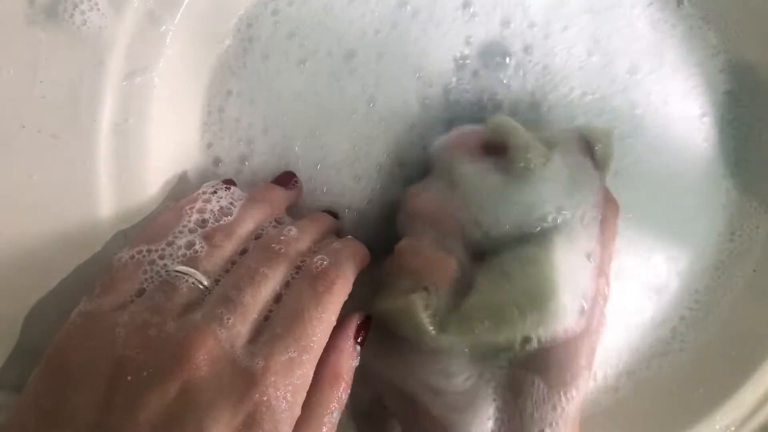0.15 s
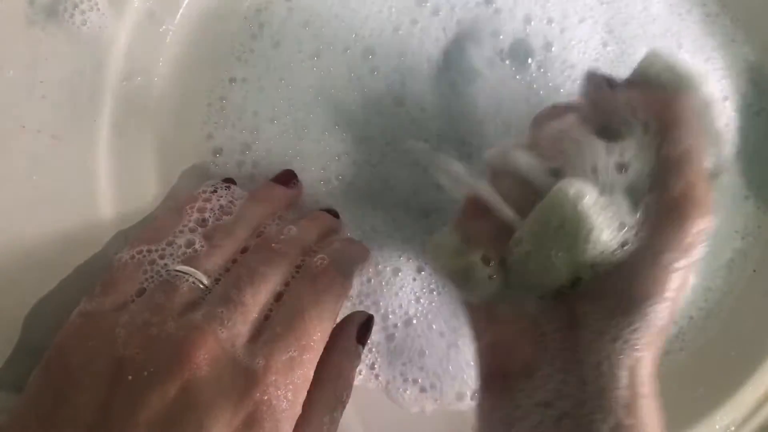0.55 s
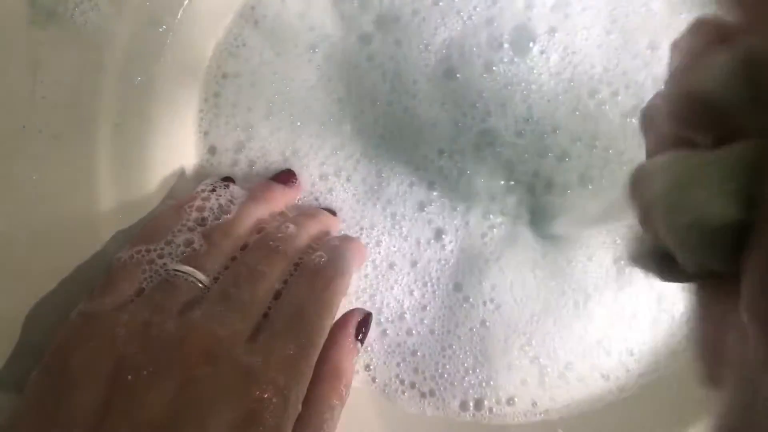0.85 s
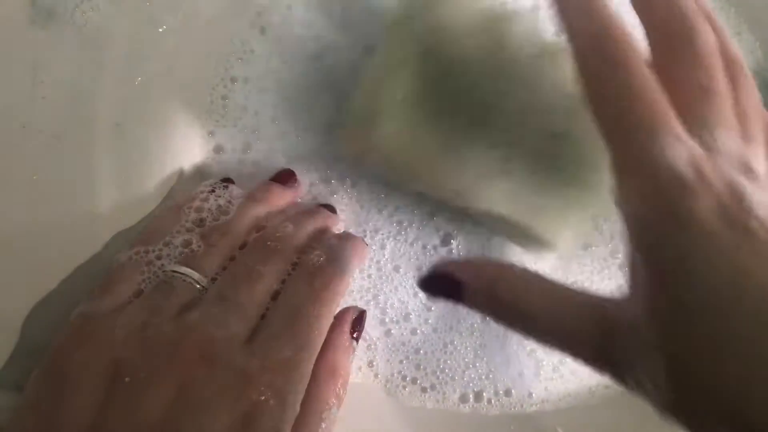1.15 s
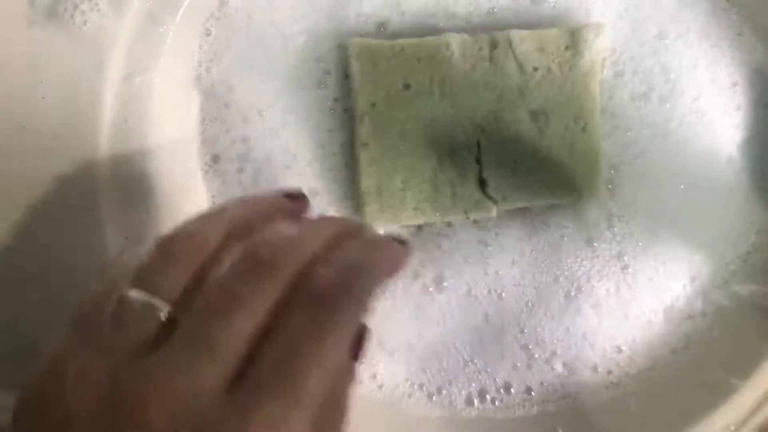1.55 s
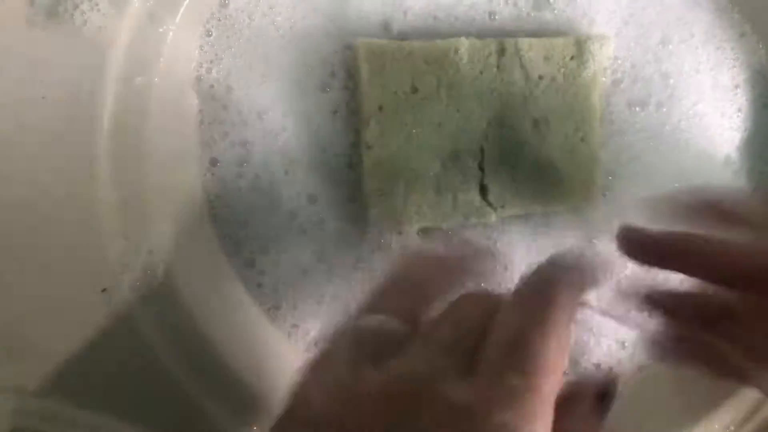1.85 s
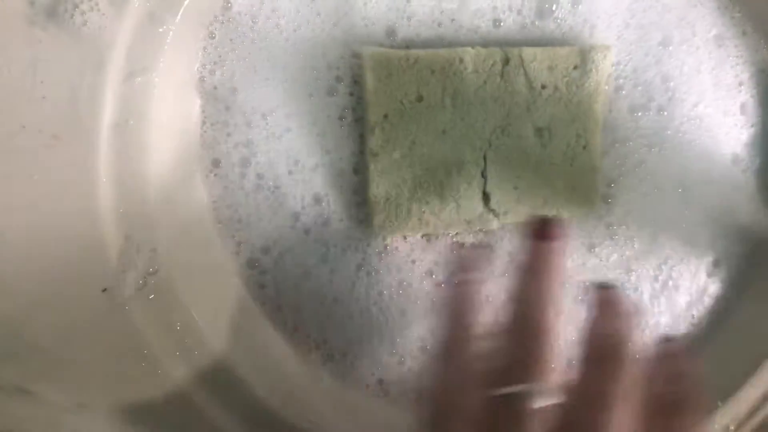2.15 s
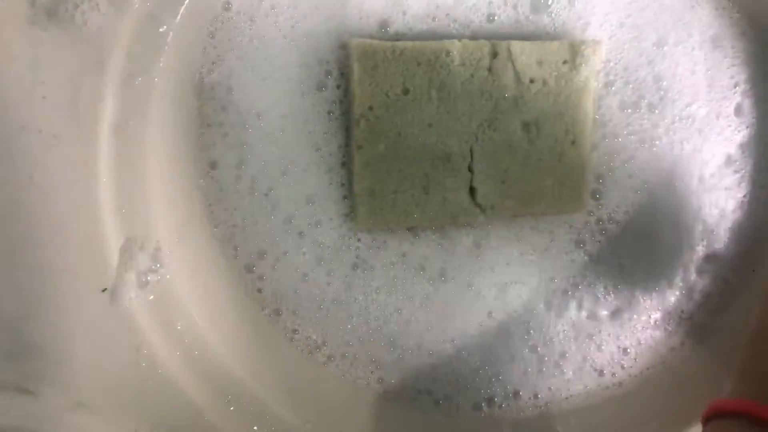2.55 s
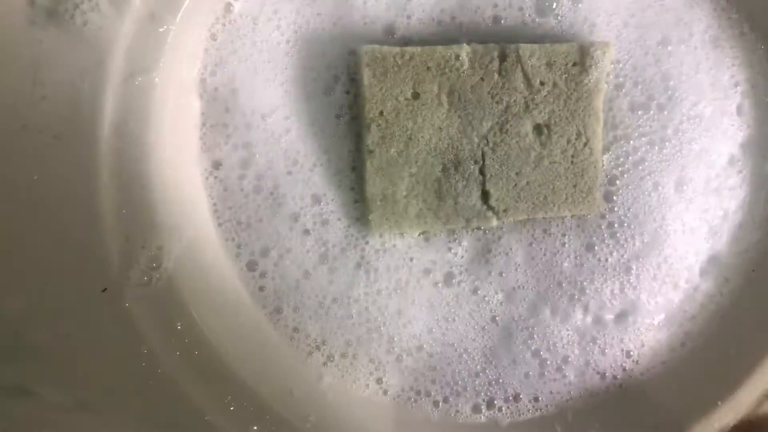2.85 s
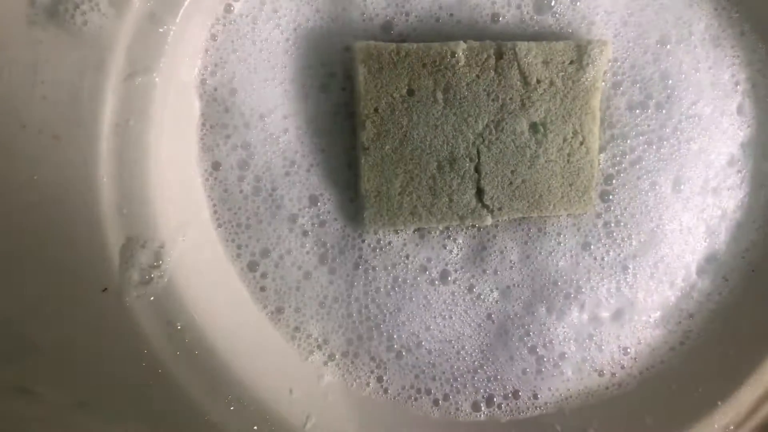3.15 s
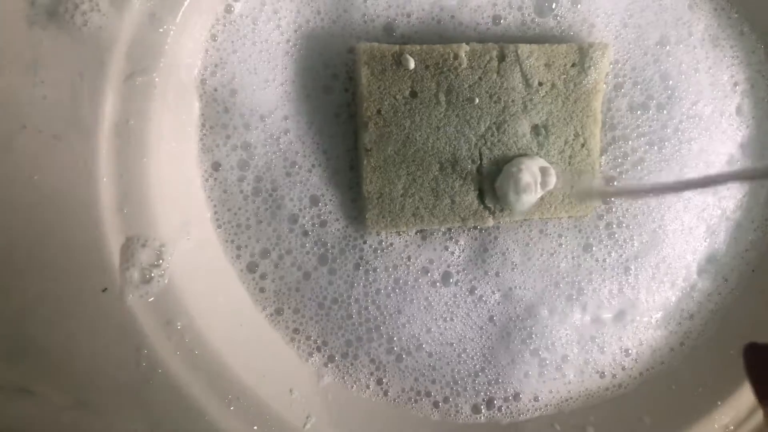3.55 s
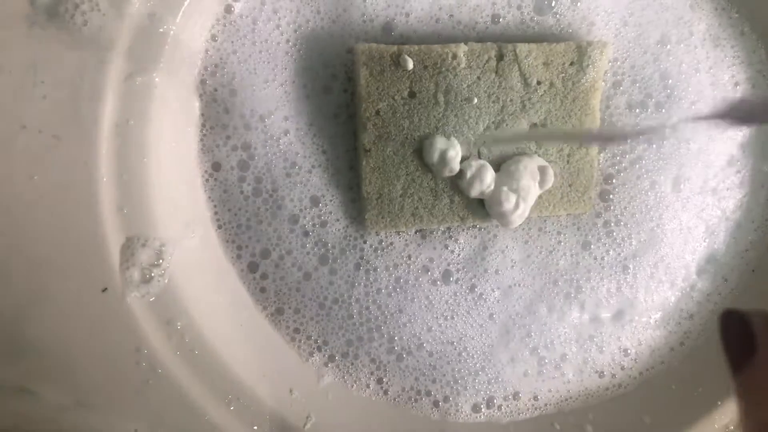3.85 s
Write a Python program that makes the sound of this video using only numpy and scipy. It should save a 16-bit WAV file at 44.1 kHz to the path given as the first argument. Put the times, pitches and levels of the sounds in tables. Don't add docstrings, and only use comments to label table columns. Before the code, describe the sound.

Foam spurts and gurgles out of a spray can, preceded by wet sponge squelching and taps

```python
import sys
import numpy as np
from scipy import signal
from scipy.fft import rfft, irfft, next_fast_len
from scipy.io import wavfile

SR = 44100
rng = np.random.default_rng(int(sys.argv[2]) if len(sys.argv) > 2 else 0)


def voltage_ratio(decibels):
    exponent = np.asarray(decibels, float) / 20
    return 10 ** exponent


def put_to_file(sound):
    columns = np.atleast_2d(sound).T
    safe = np.clip(columns, -1, 1)
    whole_steps = np.round(safe * 32767)
    wavfile.write(sys.argv[1], SR, whole_steps.astype(np.int16))


N = 176400

# (frequency [Hz], density [dB per Hz])
ROOM_COLOUR = [(30, -47), (66, -3.5), (117, -6), (230, -5.5), (300, -5), (520, -10), (950, -15),
               (1500, -24)]
# (frequency [Hz], width [Hz], level [dB])
MOTOR_TONES = [(120.5, 9.3, -47), (165.5, 16, -50.5), (307.6, 6.7, -52.5)]
# (frequency [Hz], density [dB per Hz])
FOAM_COLOUR = [(900, -20), (1700, -5), (4000, -8.5), (9000, -13), (16500, -23.5)]
# (time [s], gain [dB])
CHANGE_GAIN = [
    (2.188, -11.5),
    (2.194, -10),
    (2.194, -55),
    (2.217, -65),
    (2.233, -51),
    (2.239, -26),
    (2.258, -12),
]

# (time [s], peak [dB], tail level [dB], tail t60 [s])
SPONGE_DROP = [
    (1.234, -54, -46, 0.05),
    (1.238, -29, -30, 0.067),
    (1.2475, -23, -21, 0.04),
    (1.2520, -22, -25, 0.04),
    (1.260, -25, -45, 0.24),
    (1.2655, -19.5, -40.5, 0.017),
]
RIM_TAPS = [
    (1.944, -43.5, -41.5, 0.22),
]
CAN_SET_DOWN = [
    (2.520, -7.5, -30.5, 0.16),
]
CAP_KNOCKS = [
    (2.836, -38, -55, 0.13),
    (3.028, -29, -61, 0.057),
]
CONTACT_TICKS = [
    (1.2510, -21.5, -34.5, 0.087),
    (1.9440, -29, -43, 0.26),
    (2.5110, -28, -43, 0.053),
]
# (frequency [Hz], level [dB], t60 [s])
BASIN_MODES = [(355, -2, 0.028), (593, -1, 0.031), (950, -4.5, 0.027), (1920, 0, .012), (2980, -8, 0.0093)]
CAN_MODES = [(154, -7, 0.031), (584, -4.5, 0.022), (1000, -2, 0.013), (1320, -5.5, 0.05),
             (1760, -3.5, 0.0037)]
CAP_MODES = [(600, 3, 0.023), (2140, 6, 0.02), (3000, -4, .006)]
TICK_MODES = [(3720, 1, 0.0019), (7500, 9, 0.0017), (12900, -7, 0.00038)]

# (time [s], peak
# [dB], pitch [Hz])
BUBBLE_POPS = [(0.135, -25.5, 2300), (0.1517, -23.5, 2000), (1.2506, -11.5, 1950), (0.4486, -32.5, 1830),
               (0.7759, -34, 1880), (0.812, -33, 3120), (0.8441, -29, 4750), (0.8678, -37, 3000),
               (0.892, -30, 5140), (1.1286, -30.5, 5400), (1.7624, -44, 8400), (3.0642, -39.5, 5080),
               (3.0905, -26, 5150),
               (0.2092, -35.5, 3200), (0.385, -38, 3530), (1.4834, -46, 3580), (1.5194, -44, 5090),
              (1.8066, -46, 3670), (1.994, -40, 4380), (2.3471, -46, 5610), (2.3814, -51, 3600),
              (2.6167, -42, 4980), (2.643, -42, 6820), (2.7901, -52, 5980), (2.8707, -42, 3520)]

# (time [s], fizz level [dB], squelch level [dB])
WRING = [
    (0, -57, -61),
    (.1, -49, -52.5),
    (.36, -43.5, -46.5),
    (.5, -41.5, -44),
    (.63, -33, -44.5),
    (.72, -38.5, -41.5),
    (.79, -43.5, -52),
    (.89, -41, -58),
]
# (time [s], level [dB])
REFILL = [
    (.89, -40),
    (.92, -32),
    (.98, -29),
    (1.04, -36.5),
    (1.07, -39),
    (1.13, -35.5),
    (1.19, -48.5),
]
# (frequency [Hz], density [dB per Hz])
FIZZ_COLOUR = [(900, -15), (1600, -2), (3500, -7.5), (4400, -2.5), (9000, -8), (16500, -28.5)]
# (frequency [Hz], density [dB per Hz])
SQUELCH_COLOUR = [(250, 5), (500, 0), (1000, -5.5), (3000, -8.5)]
# (time [s], length [s], level [dB], pitch [Hz], width [Hz])
PORE_JETS = [
    (0.506, 0.024, -39, 3630, 870),
    (0.552, 0.035, -29.5, 3620, 630),
    (0.601, 0.077, -35, 3700, 610),
    (0.625, 0.026, -33, 5200, 600),
    (0.625, 0.015, -32, 9000, 5000),
    (0.645, 0.074, -31.5, 8000, 4800),
    (2, 0.069, -48, 3600, 3200),
    (1.65, 0.1, -57.5, 3700, 400),
    (0.055, 0.062, -41, 5900, 5900),
    (0.95, 0.05, -34.5, 4500, 2200),
]

# (time [s], level [dB])
GAS_FLOW = [
    (3.062, -52),
    (3.087, -38.5),
    (3.092, -28.5),
    (3.14, -27.5),
    (3.22, -33.5),
    (3.34, -32),
    (3.75, -56),
]
# (frequency [Hz], density [dB per Hz])
GAS_COLOUR = [(500, -6.5), (1300, -7.5), (3300, -1.5), (7000, 0), (10000, -9), (12500, -34), (16500, -17)]
# (time [s], tube level [dB], mouth level [dB], mouth centre [Hz])
FOAM_FLOW = [
    (3.225, -60, -57, 4700),
    (3.33, -35, -78, 4660),
    (3.48, -32, -44, 4100),
    (3.58, -28.5, -37, 4397),
    (3.66, -29.5, -27, 4825),
    (3.76, -30, -25, 4573),
    (3.86, -27, -24.5, 4260),
    (4.0, -27, -27, 4350),
]
# (frequency [Hz], width [Hz], level [dB])
TUBE_MODES = [(1370, 610, -0.5), (2260, 670, -7), (2930, 1100, -10), (904, 490, -11), (272, 260, -13.5)]
# (multiple of mouth centre [1], width [Hz], level [dB])
MOUTH_MODES = [(.82, 450, -7), (1.0, 450, 0), (1.2, 650, -7), (1.5, 900, -14), (1.8, 900, -17)]
# (time [s], peak [dB], pitch [Hz])
TUBE_SLUGS = [(3.525, -31, 1400), (3.557, -26, 1370), (3.598, -19.5, 1400), (3.631, -13.5, 1360),
              (3.656, -20, 1370), (3.665, -13.5, 1380), (3.676, -18, 1310), (3.699, -16, 1440),
              (3.716, -15, 1410), (3.737, -15, 1332), (3.747, -17, 1370), (3.76, -18, 1460),
              (3.783, -25, 1400), (3.798, -16, 1446), (3.811, -9.5, 1273), (3.822, -18, 1240),
              (3.836, -11, 1265), (3.85, -16, 1380), (3.868, -8, 1374), (3.882, -9, 1320),
              (3.906, -16, 1440), (3.919, -18, 1440), (3.931, -5, 1220), (3.951, -16, 1376),
              (3.97, -17, 1270), (3.986, -11, 1288)]
# (time [s], peak [dB], pitch [Hz])
MOUTH_SLUGS = [(3.5873, -22.5, 4080), (3.604, -18, 3770), (3.6134, -24, 4590), (3.6286, -18, 4940),
               (3.6506, -19, 4920), (3.6755, -21, 4760), (3.685, -15.5, 4530), (3.711, -14.5, 4800),
               (3.7344, -17, 4540), (3.762, -12, 5330), (3.7695, -18, 4220), (3.798, -12.5, 4200),
               (3.8324, -14.5, 4580), (3.8425, -8, 4480), (3.85, -8.5, 4280), (3.8717, -13, 4160),
               (3.883, -13, 4210), (3.898, -12.5, 5250), (3.9315, -16, 4220), (3.9373, -12, 4210),
               (3.959, -13, 4220), (3.9924, -10.5, 4170)]
# (time [s], peak [dB], tube share [dB])
SPITS = [(3.1334, -12.5, -13.5), (3.2264, -16, 4), (3.23, -7.5, -3), (3.233, -3.5, -14), (3.2452, -1.5, -5),
         (3.253, -3, -21), (3.2913, -16, 7.5), (3.2953, -3, -4), (3.305, -4, -9), (3.3176, -17, -7),
         (3.7136, -18.5, 1.5), (3.746, -18, 3), (3.7631, -13, -31), (3.768, -6, -28), (3.797, -11.5, 2),
         (3.8981, -12.5, -20), (3.906, -14, -12), (3.941, -16, -5), (3.954, -8, -33), (3.961, -9.5, -20),
         (3.9868, -17, 10)]
# (frequency [Hz], density [dB per Hz])
SPIT_COLOUR = [(2500, -14), (4400, -1), (5300, 0), (8000, 5), (11000, -10), (16500, -14)]

ROOM_DB, FOAM_DB, FOAM_LATER_DB = -45.5, -51.5, -2.5
ROOM_T60_S, ROOM_WET_DB, WALL_CUT_HZ = 0.42, -16.5, 7600
RATTLE_SHARE = 0.22
POP_CYCLES = 2.9
SLUGS_PER_S, SLUG_DB = 2500, 4.5
SPUTTER_DB, TUBE_BED_DB, MOUTH_BED_DB = 3.5, 0.5, 2.5
SPIT_RISE_S, SPIT_T60_S = 0.0014, 0.034
AIR_DB, AIR_HZ = -54, 10500


def rms_one(x):
    return x / np.sqrt(np.mean(x ** 2) + 1e-20)


def butter(x, order, hz, kind):
    return signal.sosfilt(signal.butter(order, hz, kind, fs=SR, output="sos"), x)


def in_time(rows, fade_s=0.01):
    s, *columns = np.transpose(rows)
    t = np.arange(N) / SR
    opening = np.clip((t - s[0]) / fade_s + 1, 0, 1)
    closing = np.clip((s[-1] - t) / fade_s + 1, 0, 1)
    return [np.interp(t, s, c) for c in columns] + [opening * closing]


def drift(rate_hz):
    r = np.exp(-40 * np.pi * rate_hz / SR)
    noise = rng.standard_normal(N // 20 + 2002)
    slow = signal.lfilter([1], [1, -2 * r, r * r], noise)[2000:]
    return np.interp(np.arange(N) / 20, np.arange(len(slow)), rms_one(slow))


def grains(per_s, spread_db, hiss):
    size = voltage_ratio(spread_db * np.minimum(rng.exponential(1, N), 5)) * rng.choice([-1, 1], N)
    clicks = rms_one(size * (rng.random(N) < per_s / SR))
    return rms_one(clicks + hiss * rng.standard_normal(N))


def coloured(x, spectrum, patchy_db, rate_hz):
    hz, db = np.transpose(spectrum)
    bands = int(2.5 * np.log2(hz[-1] / hz[0])) + 1
    edges = np.geomspace(hz[0], min(hz[-1], 17000), bands + 1)
    out, shared = 0, drift(rate_hz / 3)
    for k, (low, high) in enumerate(zip(edges, edges[1:])):
        shifted = np.roll(x, SR // 10 * (k // 2))
        band = (-1) ** k * butter(shifted, 2, [low, high], "band")
        level_db = np.interp(np.log(low * high) / 2, np.log(hz), db)
        flicker_db = patchy_db * (0.097 * shared + drift(rate_hz))
        out = out + band * voltage_ratio(level_db + flicker_db)
    return rms_one(out)


def resonance(x, hz, width_hz):
    r = np.exp(-np.pi * width_hz / SR)
    gain = (1 - r * r) / 2
    return signal.lfilter([gain, 0, -gain], [1, -2 * r * np.cos(2 * np.pi * hz / SR), r * r], x)


def sharp_band(x, hz, width_hz):
    return rms_one(resonance(resonance(x, hz, width_hz), hz, width_hz))


def ring(clicks, hz, t60_s):
    r, w = voltage_ratio(-60 / (t60_s * SR)), 2 * np.pi * hz / SR
    return signal.lfilter([0, np.sin(w)], [1, -2 * r * np.cos(w), r * r], clicks + 1e-18)


def puffs(rows, rise_s):
    t = np.arange(N) / SR
    out = 0
    for s, db, t60_s in rows:
        decay = voltage_ratio(db - 60 * np.maximum(t - s, 0) / t60_s)
        out = out + decay * np.clip((t - s) / rise_s, 0, 1)
    return out


def room_tone():
    out = voltage_ratio(ROOM_DB + 4.0) * coloured(rng.standard_normal(N), ROOM_COLOUR, patchy_db=-1.2, rate_hz=4.6)
    for hz, width_hz, db in MOTOR_TONES:
        out += voltage_ratio(db) * sharp_band(rng.standard_normal(N), hz, width_hz)
    since_s = np.arange(N) / SR - CHANGE_GAIN[3][0]
    later_db = FOAM_LATER_DB * (since_s > 0) * np.clip(1 - since_s / 0.16, -0.6, 1)
    crackle = coloured(grains(800, 5.1, 1.9), FOAM_COLOUR, patchy_db=1.5, rate_hz=23)
    return out + voltage_ratio(FOAM_DB + later_db) * crackle


def room(x):
    size = next_fast_len(N + SR)
    w = 2 * np.pi * np.arange(size // 2 + 1) / size
    dull = 1 / (1 + 1j * w * SR / (2 * np.pi * WALL_CUT_HZ))
    response = 0
    for k, lag_s in enumerate(rng.uniform(0.009, 0.035, 10)):
        loop = voltage_ratio(-60 * lag_s / ROOM_T60_S) * dull * np.exp(-1j * w * int(lag_s * SR))
        response = response + (-1) ** k * loop / (1 - loop)
    return irfft(response * rfft(x, size), size)[:N]


def knock(hits, modes):
    out, blows = 0, np.zeros(N)
    blows[[int(h[0] * SR) for h in hits]] = voltage_ratio(np.array(hits)[:, 1] - 1)
    for k, (hz, level_db, t60_s) in enumerate(modes):
        shorten = (modes[1][0] / hz) ** 0.24
        tail = puffs([(s, tail_db - 2.0, fade_s * shorten) for s, _, tail_db, fade_s in hits], 0.0014)
        rattle = ring(tail * rng.standard_normal(N), hz, RATTLE_SHARE * t60_s)
        out = out + voltage_ratio(level_db) * ((-1) ** k * ring(blows, hz, t60_s) + rattle)
    return butter(out, 2, [0.56 * modes[0][0], min(1.63 * modes[-1][0], 20000)], "band")


def knocks():
    out = knock(SPONGE_DROP + RIM_TAPS, BASIN_MODES) + knock(CAN_SET_DOWN, CAN_MODES)
    return out + knock(CAP_KNOCKS, CAP_MODES) + knock(CONTACT_TICKS, TICK_MODES)


def pops():
    noise, out = rng.standard_normal(N), 0
    for s, db, hz in BUBBLE_POPS:
        crackle = noise * puffs([(s, db + 4.0, 0.012)], 0.0004)
        out = out + resonance(ring(crackle, hz, POP_CYCLES / hz), hz, 1.24 * hz)
    return out


def sponge():
    fizz_db, squelch_db, on = in_time(WRING)
    fizz = coloured(grains(2500, 5.1, 0.65), FIZZ_COLOUR, patchy_db=2.5, rate_hz=15)
    squelch = coloured(grains(900, 4.1, 1.0), SQUELCH_COLOUR, patchy_db=2.5, rate_hz=19)
    out = on * (voltage_ratio(fizz_db) * fizz + voltage_ratio(squelch_db + 6.5) * squelch)
    refill_db, on = in_time(REFILL)
    out += on * voltage_ratio(refill_db) * coloured(grains(3000, 4.9, 1.0), FIZZ_COLOUR, patchy_db=2.5, rate_hz=20)
    jet, t = grains(3000, 4.5, 0.58), np.arange(N) / SR
    for s, length_s, db, hz, width_hz in PORE_JETS:
        rise = np.clip((t - s) / 0.00084, 0, 1)
        sag = voltage_ratio(-9 * np.maximum(t - s, 0) / length_s)
        close = np.clip((s + 1.07 * length_s - t) / 0.0029, 0, 1)
        out += voltage_ratio(db) * rise * sag * close * sharp_band(jet, hz, width_hz)
    return out


def tube_noise():
    out = 0
    for hz, width_hz, db in TUBE_MODES:
        out = out + voltage_ratio(db) * sharp_band(grains(SLUGS_PER_S, 4.2, 0.99), hz, width_hz)
    return rms_one(out)


def mouth_noise(mouth_hz):
    cycles, out = np.cumsum(mouth_hz * voltage_ratio(0.28 * drift(15))) / SR, 0
    for multiple, width_hz, db in MOUTH_MODES:
        pair = butter([grains(SLUGS_PER_S, 5.3, 0.55) for _ in range(2)], 2, width_hz / 2, "low")
        turn = 2 * np.pi * multiple * cycles
        band = rms_one(pair[0] * np.cos(turn) + pair[1] * np.sin(turn))
        out = out + voltage_ratio(db + 2.6 * drift(25)) * band
    return rms_one(out)


def slugs(rows, body, rise_s, t60_s, noisy_db):
    t, waver_s = np.arange(N) / SR, np.cumsum(0.03 * drift(150.3)) / SR
    out = 0
    for s, db, hz in rows:
        tone = np.sin(2 * np.pi * hz * (t + waver_s))
        swell = puffs([(s - rise_s / 2, db + SLUG_DB, t60_s)], rise_s)
        out = out + swell * (tone + voltage_ratio(noisy_db) * body)
    return out


def spits(tube):
    spray = coloured(grains(4000, 4.3, 0.76), SPIT_COLOUR, patchy_db=3.5, rate_hz=68)
    bursts = puffs([(s, db - 5, SPIT_T60_S) for s, db, _ in SPITS], SPIT_RISE_S)
    thumps = puffs([(s, db + low_db - 3.5, 1.25 * SPIT_T60_S) for s, db, low_db in SPITS], SPIT_RISE_S)
    return spray * bursts + tube * thumps


def can():
    gas_db, on = in_time(GAS_FLOW)
    out = on * voltage_ratio(gas_db) * coloured(grains(5000, 6.0, 0.9), GAS_COLOUR, patchy_db=0.0, rate_hz=40)
    tube_db, mouth_db, mouth_hz, on = in_time(FOAM_FLOW)
    sputter_db = SPUTTER_DB * drift(83)
    tube, mouth = tube_noise(), mouth_noise(mouth_hz)
    out += on * voltage_ratio(tube_db + TUBE_BED_DB + sputter_db) * tube
    out += on * voltage_ratio(mouth_db + MOUTH_BED_DB + sputter_db) * mouth
    out += on * voltage_ratio(tube_db - 8.0) * coloured(rng.standard_normal(N), SPIT_COLOUR, patchy_db=1.5, rate_hz=18)
    out += slugs(TUBE_SLUGS, tube, rise_s=0.0046, t60_s=0.036, noisy_db=-7.5)
    out += slugs(MOUTH_SLUGS, mouth, rise_s=0.0015, t60_s=0.038, noisy_db=-8.5)
    out += on * voltage_ratio(AIR_DB) * butter(rng.standard_normal(N), 4, AIR_HZ, "high")
    return out + spits(tube)


def scene():
    near = butter(knocks() + pops() + sponge() + can(), 2, 110, "high")
    return (room_tone() + voltage_ratio(ROOM_WET_DB) * room(near) + near)[None]


def top_cut(x):
    return signal.sosfilt(signal.butter(12, 15890, fs=SR, output="sos"), x)


def record(dry):
    s, gain_db = np.transpose(CHANGE_GAIN)
    low_passed = signal.sosfilt(signal.cheby2(18, 50, 16150, fs=SR, output="sos"), dry)
    mix = low_passed * voltage_ratio(np.interp(np.arange(N) / SR, s, gain_db))
    return top_cut(mix)


dry = scene()
out = record(dry)
put_to_file(out)
```